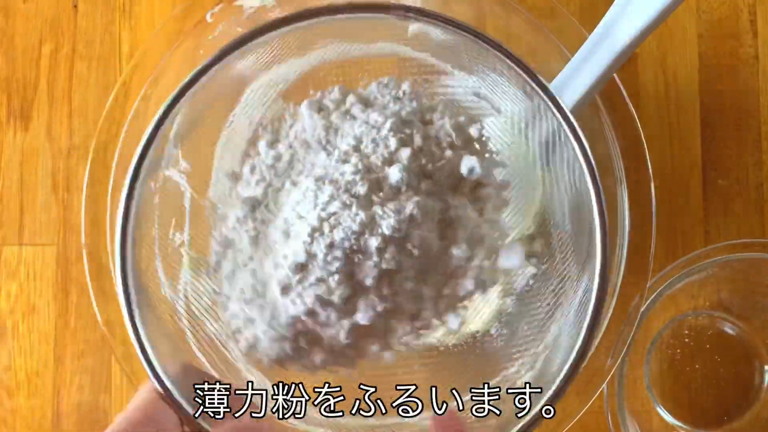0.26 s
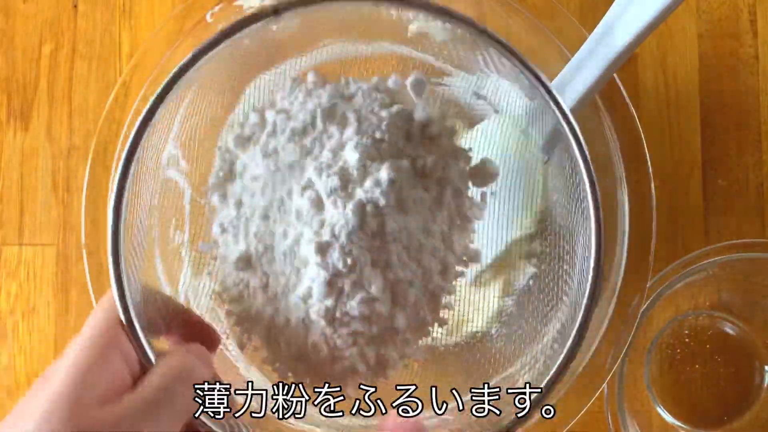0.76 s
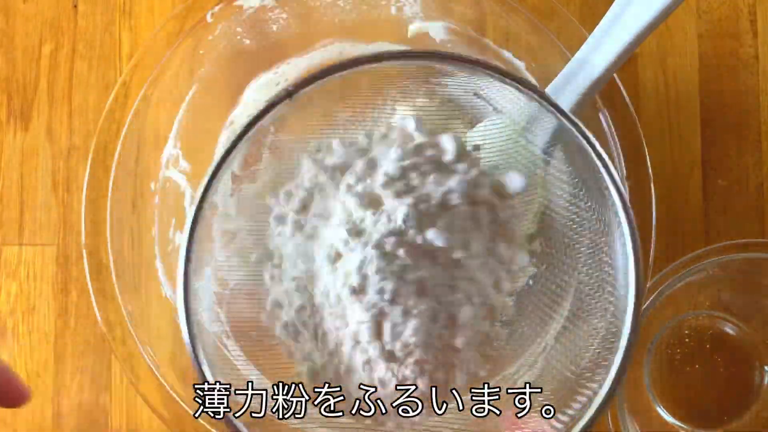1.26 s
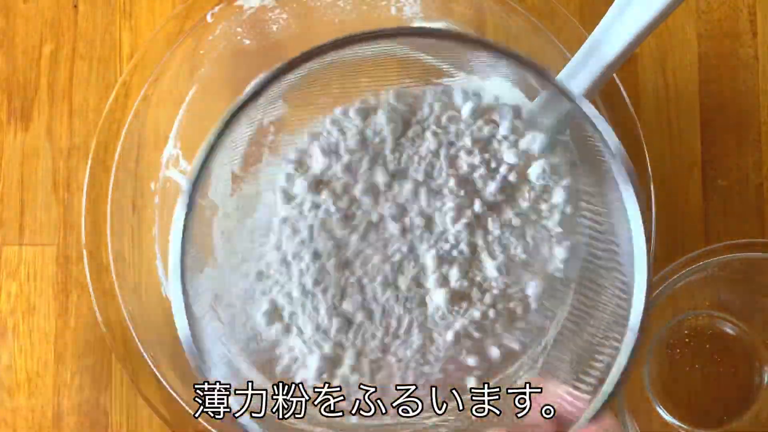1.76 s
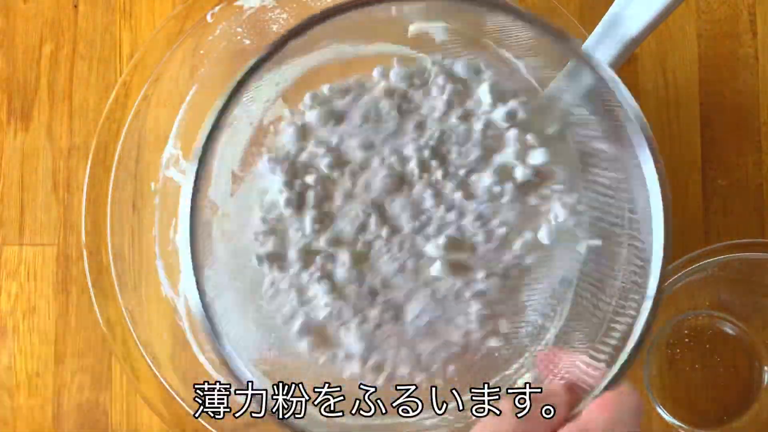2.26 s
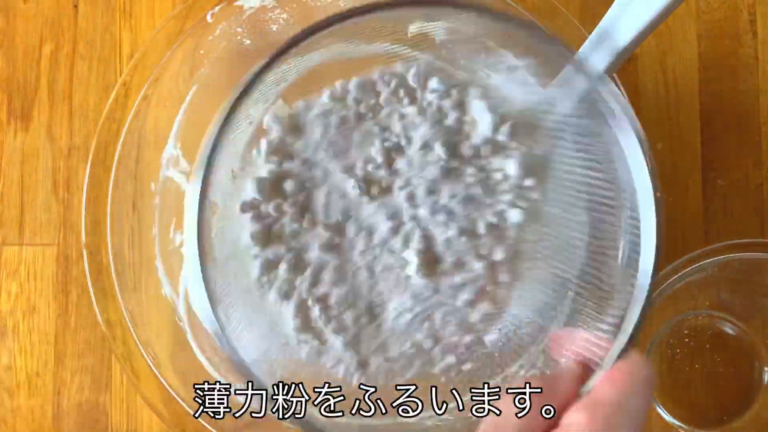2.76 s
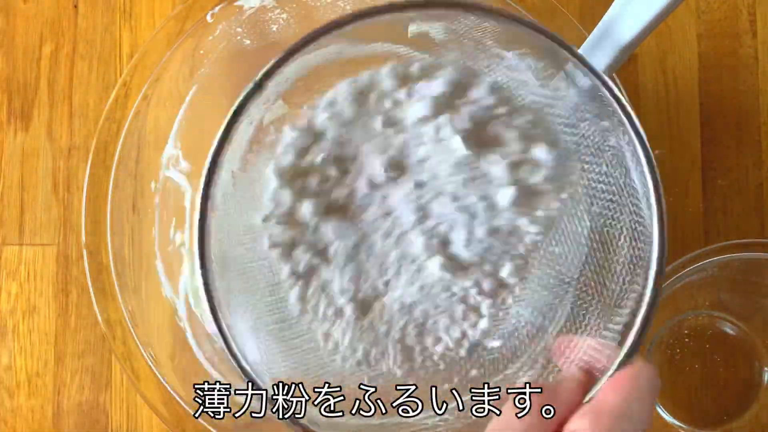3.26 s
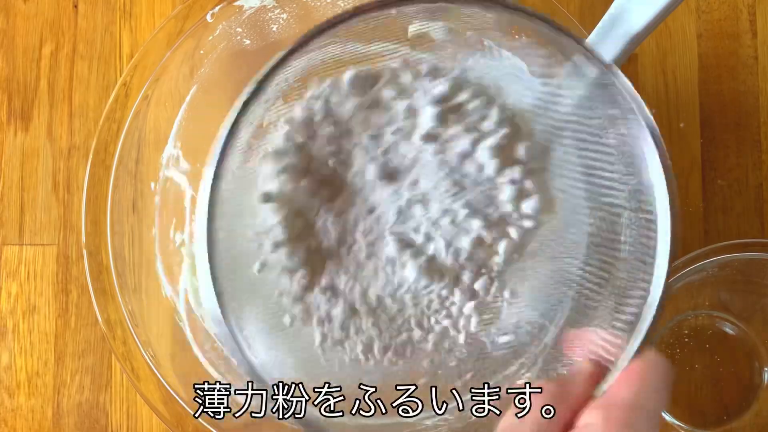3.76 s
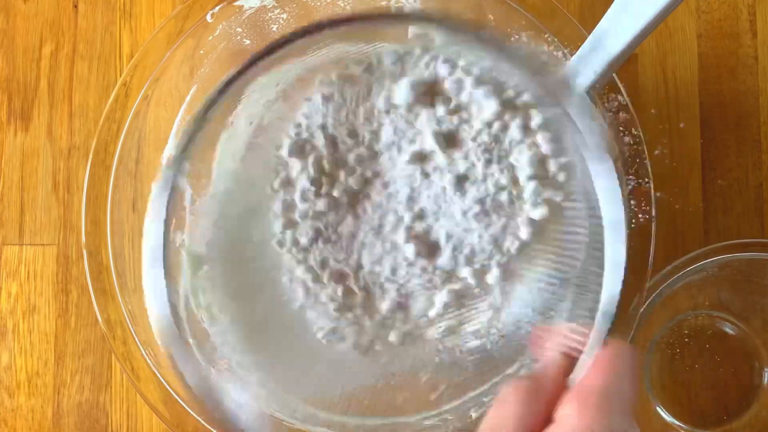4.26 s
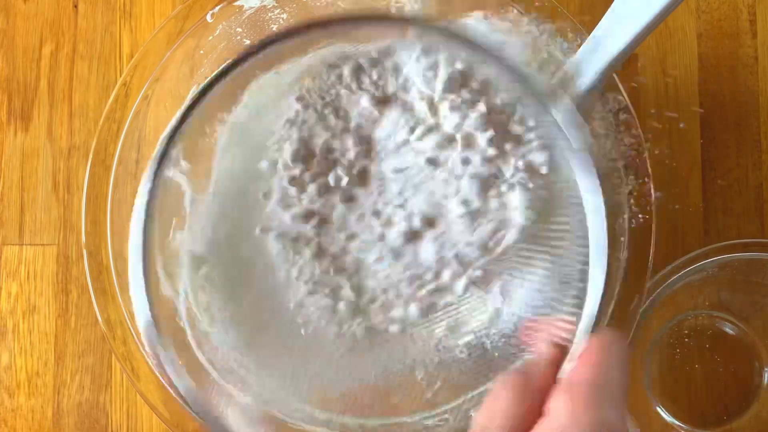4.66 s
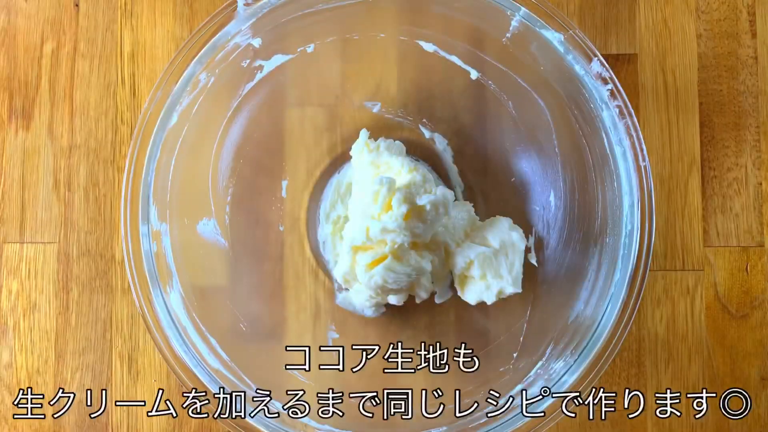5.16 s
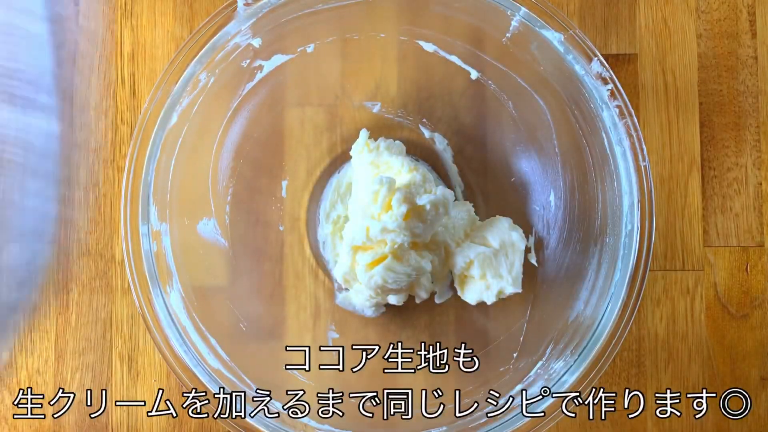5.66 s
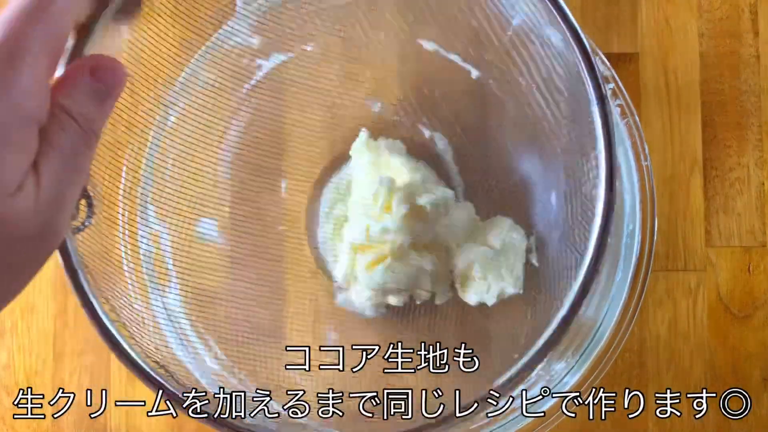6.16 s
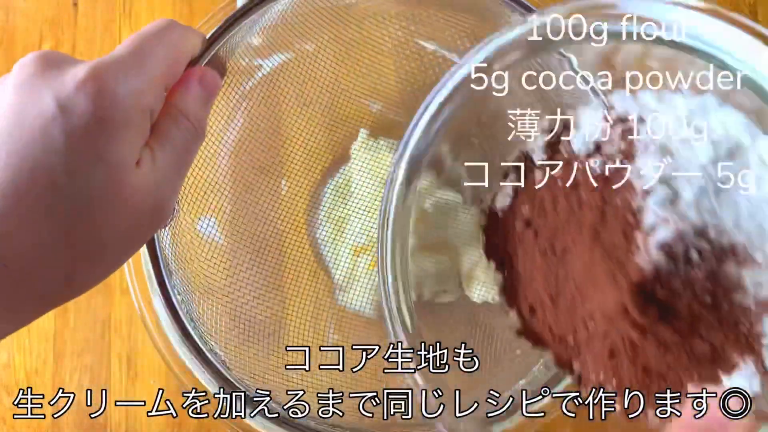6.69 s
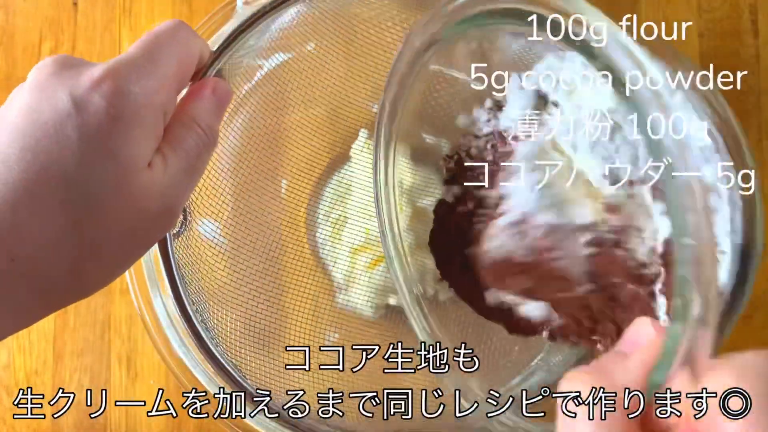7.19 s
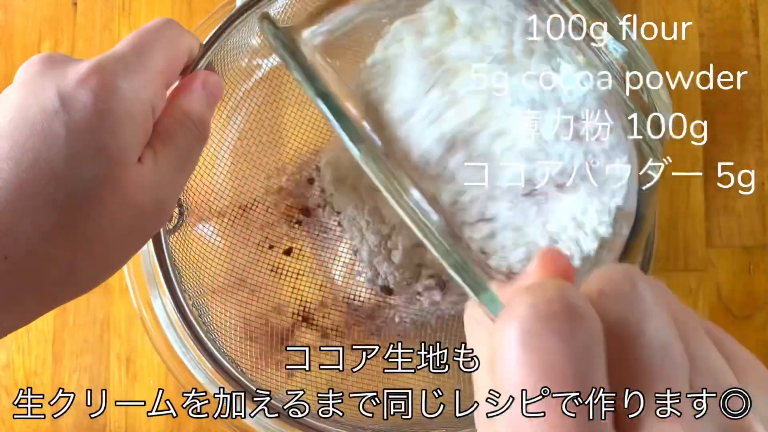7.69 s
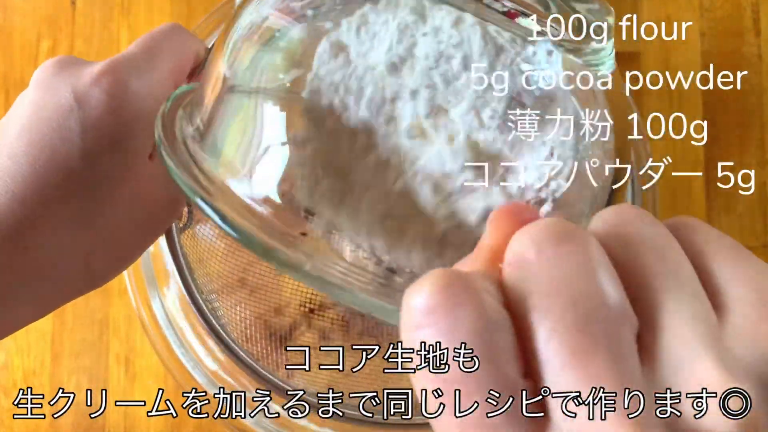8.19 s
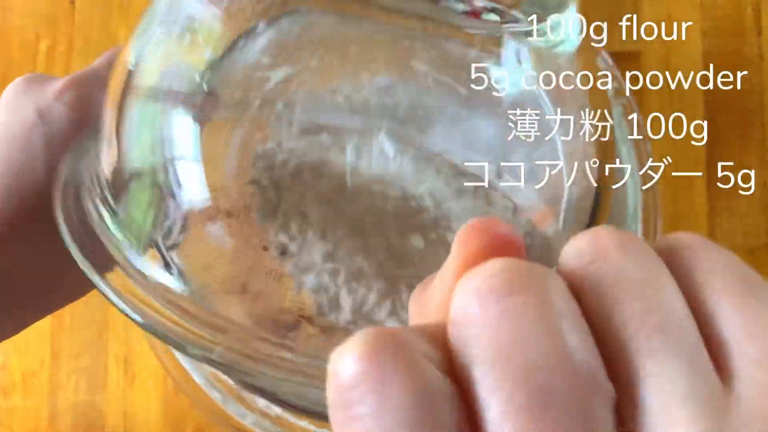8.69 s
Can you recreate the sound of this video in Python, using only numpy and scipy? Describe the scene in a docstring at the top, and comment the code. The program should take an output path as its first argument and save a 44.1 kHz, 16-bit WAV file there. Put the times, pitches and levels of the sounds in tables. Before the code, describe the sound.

A metal sieve rattles on glass, flour hisses through it in steady fast strokes with one dull thud, and powder later drops in crumbly plops.

```python
"""A sieve is gripped over a glass bowl in a quiet kitchen: its wire mesh ticks and scrapes, as noise bursts through wire modes.
It is then shaken: at every stroke filtered grains swish, and in the midst one dull thud of swelling noise bands and sines
sounds in the building. A wavering low sine hums at times, and hands rumble softly as filtered noise.
Later the sieve is set over a bowl again and a small glass dish clinks on it, as cracks and damped sines.
Powder is jogged out last in soft, crumbly plops of noise and tiny impacts. A pair of microphones listens close by."""
import sys
import numpy as np
from scipy import signal
from scipy.fft import rfft, irfft, next_fast_len
from scipy.io import wavfile
from scipy.ndimage import uniform_filter1d

SR = 44100
rng = np.random.default_rng(int(sys.argv[2]) if len(sys.argv) > 2 else 0)


def transcribe(u):
    """Save the signal u as a 16-bit wav file named by the first command-line argument.

    u: samples, shape (n,) or (channels, n), limited to [-1, 1]; the rate is SR.
    q: integer samples, one column per channel.
    """
    v = np.clip(np.atleast_2d(u).T, -1, 1)
    q = np.round(v * 32767).astype(np.int16)
    wavfile.write(sys.argv[1], SR, q)


N = 393813
TIME = np.arange(N) / SR

# Room air, colour of the steady hiss: (frequency [Hz], gain [dB])
AIR_COLOUR = [(25, -3), (60, 13), (130, 5.5), (250, -3), (500, -8.5), (1000, -16), (2000, -19),
              (4000, -23.5), (7000, -26.5), (8500, -17), (10500, -18.5), (11700, -45), (13000, -18.5),
              (15000, -26), (16000, -52.5)]
AIR_DB = -71.5
# What the room returns of the sieve, whose 8 kHz ring is mostly direct: (frequency [Hz], gain [dB])
WALL_COLOUR = [(500, 8.5), (2500, 6), (4500, 3), (6200, 4), (7500, -7.5), (8400, -4), (9600, 5.5),
               (13000, -8), (16000, -5.5)]
# A faint low hum comes and goes: (start [s], end [s], level [dB])
HUMS = [(1.34, 2.193, -68.5), (3.19, 4.195, -73.5)]

# Hands carry the sieve over the bowl: (time [s], deep rumble [dB], grip before its trim [dB])
CARRY = [(4.6, -88, -85), (4.66, -75.5, -86), (4.79, -72, -71), (4.92, -61, -70.5), (5.62, -61.5, -66),
         (5.7, -68, -65.5), (5.979, -58, -55.5), (7.0, -73.5, -74.5)]
# Rumble and grip while the hands merely hold the utensils
HOLD_DEEP_DB, HOLD_GRIP_DB = -72.5, -74.5
# Colours of the deep rumble and of the grip: (frequency [Hz], gain [dB])
RUMBLE_COLOUR = [(25, -19.5), (42, -10.5), (58, 6), (72, -11), (100, -23), (200, -29.5)]
GRIP_COLOUR = [(60, -18.5), (95, 2), (120, 3), (160, -5), (240, -11.5), (330, -22), (600, -35.5)]
# Soft rustles, perhaps of sleeves as the arms move: (time [s], level [dB], half length [s])
RUSTLES = [(0, -71.5, 0.21), (0.407, -72, 0.07), (1.052, -69.5, 0.15), (1.675, -76.5, 0.15),
           (4.668, -75, 0.11), (4.977, -76, 0.11), (5.789, -71.5, 0.21)]
# Dull rubs of the fingers on the utensils: (time [s], level [dB], half length [s], pitch [Hz])
RUBS = [(0.787, -74.5, 0.11, 338), (0.976, -73, 0.3, 370), (1.163, -63.5, 0.041, 348),
        (3.419, -68.5, 0.071, 330), (3.611, -74.5, 0.2, 324), (4.776, -58, 0.034, 127.6),
        (6.081, -63, 0.067, 234), (6.253, -89, 0.037, 239), (6.523, -71, 0.12, 236),
        (8.144, -69, 0.13, 129.7), (8.72, -67.5, 0.17, 130)]
# Colour of a rub at the reference pitch: (frequency [Hz], gain [dB])
FINGER_COLOUR = [(120, -8), (200, 5.5), (280, 2.5), (360, -8), (480, -14.5), (700, -32.5)]
FINGER_REF_HZ = 240

# A dull thud in the building, by noise band: (centre [Hz], level [dB], rise [s], t60 [s])
THUD_BANDS = [(63.2, -50, 0.048, 0.92), (126, -53, 0.0042, 1), (188.4, -46, 0.0073, 0.57),
              (299, -45, 0.0046, 0.62), (406, -54, 0.0018, 0.41), (540, -48, 0.001, 0.5),
              (660, -71, .001, 0.14), (840, -63.5, 0.0019, 0.44)]
# The thud rings the floor and swells the room's resonances: (frequency [Hz], level [dB], rise [s], t60 [s])
BOOM_MODES = [(62.3, -53, 0.038, 0.4), (144.8, -51, 0.017, 0.33), (193.4, -42, 0.13, 0.17),
              (302, -49.5, 0.081, 0.26), (332.4, -42.5, 0.001, 0.25), (508, -39, 0.0016, 0.11),
              (542, -51, 0.0011, 0.17), (635, -51, 0.00086, 0.11), (710, -72, 0.0017, 0.72)]
THUD_S = 2.8858

# Faint rings: the bowl's at the start, and a close cluster of wire modes near 5 kHz after the tick at 5.5 s:
# (time [s], frequency [Hz], level [dB], t60 [s])
FAINT_RINGS = [(0, 531, -60, .35), (0, 1157, -63, .2), (5.503, 4590, -77, .15), (5.503, 4770, -75, .14),
               (5.503, 4910, -75, .16), (5.503, 5130, -77, .13)]
# Glass knocks under the harder contacts:
# (time [s], level [dB], t60 [s], pitch [Hz], clink against the knock [dB])
KNOCKS = [(0.6052, -52, 0.08, 850, -26), (6.5838, -43.5, 0.14, 1950, -24), (7.2838, -49.5, 0.06, 2550, -40)]
# Colour of a glass knock at the reference pitch: (frequency [Hz], gain [dB])
GLASS_COLOUR = [(500, -19), (680, -13), (1000, -13), (1350, -2), (1900, 0), (2450, 1), (2900, -7),
                (3400, -11), (4300, -8), (5200, -2), (6300, -3), (7200, -10)]
GLASS_REF_HZ = 2000
# Modes of the hand-damped glass, which rings briefly: (frequency [Hz], level [dB], t60 [s])
CLINK_MODES = [(1300, -1, .09), (1448, 1, .1), (1965, -10, .06), (3004, -3, .06), (3671, -6, .06),
               (4247, -6, .06), (5206, -6, .06), (5889, -3, .07)]

# Mesh dragging over glass: (start [s], end [s], level [dB], overtones against that level [dB])
SCRAPES = [(0.031, 0.143, -66.5, -8), (0.222, 0.236, -52, -1.5), (0.246, 0.271, -52.5, -3),
           (0.371, 0.492, -59, -9), (0.5, 0.538, -59, -8.5), (0.425, 0.437, -55.5, -9),
           (0.541, 0.562, -53, -8), (0.579, 0.636, -47, -1), (0.67, 0.699, -50, 2),
           (0.77, 0.782, -61.5, -7), (0.954, 1.04, -66.5, -13), (6.17, 6.241, -69.5, -15),
           (6.659, 6.765, -70.5, -27.5), (7.057, 7.217, -68, -27), (7.283, 7.327, -71, -23)]
# Wire mesh ticks against the bowl, levels before trims: (time [s], contact time [s], ring pitch [Hz],
# ring level [dB], then against the ring: low modes [dB], modes near 10 kHz [dB], overtones [dB])
TICKS = [(0.1844, 0.0017, 7710, -47.0, -14.0, -5.0, -4.0),
         (0.2022, 0.0032, 8280, -26.5, -17.5, -11.5, -6.5),
         (0.2378, 0.0026, 8000, -22.0, -23.5, -12.5, -8.0),
         (0.2497, 0.0034, 7800, -28.0, -22.5, -13.5, -9.5),
         (0.2772, 0.0029, 7830, -43.5, -18.5, -16.0, -14.5),
         (0.3217, 0.0011, 8040, -46.0, -25.5, -22.0, -22.0),
         (0.4056, 0.0035, 7880, -34.5, -27.0, -21.5, -16.0),
         (0.4204, 0.0038, 8090, -46.0, -21.0, -17.0, -14.0), (0.4304, 0.002, 8080, -37.5, -14, -8, -10),
         (0.4373, 0.0011, 8000, -34.5, -18.0, -17.0, -13.5),
         (0.4526, 0.0029, 8330, -41.5, -23.5, -20.5, -15.5),
         (0.4902, 0.0013, 7800, -24.5, -21.0, -22.0, -15.5),
         (0.5418, 0.0015, 7930, -48, -16.5, -16.0, -9.0), (0.5848, 0.0046, 8330, -37.0, -20.5, -7.5, 0.0),
         (0.5925, 0.0026, 8030, -29.0, -21.0, -9.5, -7.0),
         (0.5955, 0.0031, 8060, -32.0, -23.5, -8.0, -12.5), (0.6, 0.0022, 8130, -29.5, -28.0, -17.5, -21.0),
         (0.6056, 0.0018, 8160, -14.5, -26.0, -17.0, -10.0),
         (0.6081, 0.0022, 8300, -25.0, -21.5, -15.5, -5.0),
         (0.6124, 0.0052, 8280, -44.0, -19.5, -10.0, -7.0),
         (0.6236, 0.0023, 8160, -26.5, -19.0, -11.0, -2.5),
         (0.6277, 0.0058, 8170, -35.5, -19.0, -7.5, -3.5), (0.6339, 0.0045, 8310, -37.5, -18.0, -9.5, -4.0),
         (0.6757, 0.0013, 8050, -46.5, -15.0, -6.0, 5), (0.6926, 0.0027, 8220, -42.5, -16.0, -10.0, 0.5),
         (0.7149, 0.0019, 8090, -38.5, -16.0, -8.0, -7.0),
         (0.7183, 0.0007, 8200, -23.0, -23.5, -14.0, -10.0),
         (0.7566, 0.0034, 8550, -29.0, -24.0, -9.5, -9.5), (0.779, 0.006, 8550, -51.0, -14.5, -9.5, -7.0),
         (0.9272, 0.0014, 7840, -47.5, -27.0, -24.0, -23.5),
         (1.0744, 0.0008, 7930, -28.5, -18.0, -19.5, -10.0),
         (1.088, 0.0015, 8160, -49.5, -16.0, -17.5, -7.0),
         (1.1229, 0.0021, 8120, -42.5, -20.0, -17.0, -16.5),
         (5.1733, 0.0011, 8390, -49.0, -7.5, -14.0, -11.0),
         (5.2968, 0.0026, 8130, -42.0, -16.5, -8.0, -7.5), (5.3011, 0.0041, 7840, -49.0, -17.5, -9.5, -8.5),
         (5.5026, 0.0019, 7640, -43.0, -12.0, 0.5, -1.5),
         (5.9416, 0.0014, 7980, -48.5, -19.0, -21.5, -21.0),
         (6.0437, 0.0062, 8190, -71.0, -21.0, -18.0, -24.5),
         (6.165, 0.0019, 8110, -61.0, -20.0, -15.5, -15.5),
         (6.5839, 0.0008, 8260, -28.5, -14.5, -13.5, -9.5),
         (6.622, 0.002, 8190, -48.0, -12.5, -11.5, -14.0),
         (6.678, 0.0075, 8170, -62.5, -25.5, -23.0, -33.0),
         (6.7002, 0.0012, 8200, -52.5, -28.0, -24.5, -35.5),
         (6.7216, 0.0029, 8310, -53.5, -32.0, -28.0, -26.5),
         (6.7295, 0.0058, 8340, -56.5, -29.5, -23.5, -32.0),
         (6.7463, 0.0053, 8350, -63.0, -26.0, -24.0, -27.5),
         (6.9609, 0.0022, 8280, -63.5, -21.0, -20.5, -19.0),
         (7.0731, 0.004, 8470, -57.5, -28.0, -21.5, -26.5),
         (7.0844, 0.0021, 8210, -51.0, -29.0, -24.5, -27.5),
         (7.0939, 0.0009, 8580, -49.5, -28.5, -19.0, -31.0),
         (7.1013, 0.0013, 8000, -43.5, -32.0, -23.0, -37.5),
         (7.106, 0.0052, 8570, -54.5, -35.0, -12.0, -32.0),
         (7.1294, 0.0047, 8500, -58.0, -26.0, -15.5, -28.0),
         (7.1408, 0.0024, 8240, -53.5, -21.5, -19.5, -26.5),
         (7.1467, 0.0035, 8260, -47.5, -27.0, -16.0, -26.5),
         (7.1828, 0.0014, 8470, -42.0, -36.5, -22.5, -34.0),
         (7.2073, 0.003, 8340, -51.5, -40.0, -42.5, -38.5),
         (7.2155, 0.0057, 8330, -60.5, -27.0, -25.0, -33.5),
         (7.2938, 0.0027, 8200, -64.0, -9.5, -15.5, -24.5),
         (7.3055, 0.0007, 8040, -51.0, -17.0, -23.0, -25.0),
         (8.3004, 0.0019, 7920, -47.5, -23.0, -16.0, -15.5)]
# Four groups of wire modes, from the main ring at its reference pitch, through the low modes
# and the modes near 10 kHz, to the overtones: (frequency [Hz], gain [dB])
MESH_COLOUR = [(5500, -43), (6500, -30), (7300, -11), (7750, -8), (8100, -3), (8400, -5), (8800, -12.5),
               (9500, -25), (10800, -32.5), (11600, -42)]
LOW_COLOUR = [(600, -25), (1000, -15.5), (1700, -16.5), (2800, -5.5), (3400, -7.5), (4050, -2.5),
              (4850, -1), (5500, -4.5), (6500, -5.5), (7300, -15.5)]
UPPER_COLOUR = [(8800, -24), (9500, -9), (10100, 1.5), (10900, 7), (11600, -15)]
OVERTONE_COLOUR = [(11000, -19.5), (12400, 2.5), (13200, -5), (14400, -5.5), (15500, -13), (16500, -29)]
MESH_REF_HZ = 8060
# A wire stops chattering at once, and the bowl's first echoes are short
CHATTER_S, ECHO_T60_S = .003, .022
# The wire basket rings on: (frequency [Hz], level [dB], t60 [s])
BASKET_MODES = [(4240, -2.5, 0.11), (4650, -6, .1), (5022, -5, .1), (5350, -3.5, 0.1019), (7990, -1.5, .11),
                (8000, -1, .13), (8450, -0.5, .12), (8420, -1.5, .13), (8590, 1.5, .1), (9000, -0.5, .08),
                (9700, -0.5, 0.12), (13300, -1.5, .1), (12957, -1, .12), (14234, -1, .1)]

# Jogs of the dish that drop powder: (time [s], level [dB], length [s], crumbs against the lump [dB])
PLOPS = [(7.464, -71.5, 0.025, -4), (7.555, -74.5, 0.048, -3), (7.698, -75, 0.014, 2),
         (7.725, -76, 0.014, 1), (7.798, -73.5, 0.04, -4), (7.959, -72, 0.047, -6),
         (8.009, -69.5, 0.041, -10), (8.125, -69.5, 0.06, -8), (8.283, -64, 0.04, -8),
         (8.46, -63.5, 0.033, -8), (8.603, -64.5, 0.028, -8), (8.757, -62.5, 0.02, -5)]
# Colours of the lump in the hollow, its crumbs and the soft low heap: (frequency [Hz], gain [dB])
PLOP_COLOUR = [(70, -11), (170, 7), (330, 5.5), (560, -1.5), (750, -12), (950, -9), (1250, -41),
               (1480, -13.5), (1590, -4.5), (1700, -30), (3000, -42), (6000, -48.5)]
CRUMB_COLOUR = [(500, -8), (950, 14.5), (1300, -9.5), (1600, 6), (2100, -19), (4000, -32)]
HEAP_COLOUR = [(100, -2.5), (220, -3.5), (420, -11.5), (650, -10), (1200, -13.5), (2500, -17.5),
               (6000, -27.5)]

# Strokes of the shaken sieve, levels before trims: (time [s], mesh [dB], powder [dB])
STROKES = [(1.228, -81, -89), (1.302, -77, -79), (1.372, -74, -73.5), (1.446, -79, -85), (1.517, -73, -77),
           (1.604, -70, -82), (1.672, -64.5, -69.5), (1.742, -70, -76), (1.818, -66, -68.5),
           (1.897, -65.5, -71), (1.976, -63.5, -66), (2.061, -63, -67), (2.14, -64, -66.5),
           (2.223, -62, -67.5), (2.298, -64.5, -64.5), (2.379, -65, -66), (2.456, -64.5, -63.5),
           (2.536, -62, -64), (2.61, -62, -62.5), (2.689, -60, -62), (2.764, -61.5, -61.5),
           (2.852, -62.5, -66), (2.916, -63.5, -66.5), (3.004, -60.5, -64.5), (3.085, -61, -60.5),
           (3.165, -60, -62.5), (3.242, -61.5, -62), (3.327, -59.5, -60.5), (3.402, -61, -59.5),
           (3.493, -60.5, -59.5), (3.573, -59.5, -58.5), (3.656, -58.5, -58.5), (3.737, -61.5, -59.5),
           (3.825, -59.5, -60.5), (3.906, -60, -59.5), (3.992, -60, -62), (4.072, -59.5, -60),
           (4.155, -61, -60), (4.237, -62.5, -59.5), (4.319, -59.5, -61), (4.398, -60.5, -60),
           (4.481, -60.5, -59.5), (4.555, -62, -63.5), (4.612, -70, -82)]
# No two strokes are alike: random spread of slide length and sizzle pitch (shares)
STROKE_STRETCH, STROKE_DETUNE = .1, .012
# Sizzle that carries on around a stroke, against the stroke
LINGER_DB = -17
# Colours of the swishing mesh and of the hissing powder: (frequency [Hz], gain [dB])
SWISH_COLOUR = [(3000, -41.5), (6200, -18.5), (7100, 0), (7800, 1.5), (8450, 5), (9100, -7.5), (10500, -14),
                (11600, -36), (12600, -12.5), (15000, -20), (16000, -35)]
POWDER_COLOUR = [(250, -29), (600, -0.5), (1150, -2.5), (1700, -4), (2500, 0), (3500, -9), (5000, -16),
                 (8000, -16), (14000, -35.5)]

# Left microphone against right: midrange earlier, treble later, turning over at TURN_HZ
MID_LEAD_S, TREBLE_LAG_S, TURN_HZ = 8 / SR, 9.55 / SR, 6300
TOP_HZ = 16300


def undb(db):
    """Decibels to gain."""
    return 10 ** (np.asarray(db) / 20)


def unit(x):
    """Scale to an rms of 1."""
    return x / np.sqrt(np.mean(x ** 2) + 1e-30)


def colour(x, points):
    """Causal filter with a (Hz, dB) response, built from the cepstrum of its log gain."""
    size = next_fast_len(x.shape[-1] + 2048, real=True) * 2
    hz, db = np.transpose(points)
    f = np.arange(size // 2 + 1) * SR / size + 0.0011
    # Beyond the end points the gain falls by 18 dB an octave, by 50 dB at most
    octaves_beyond = np.maximum(np.log2(hz[0] / f), 0) + np.maximum(np.log2(f / hz[-1]), 0)
    gain_db = np.interp(np.log(f), np.log(hz), db) - np.minimum(18 * octaves_beyond, 50)
    cepstrum = irfft(np.log(undb(gain_db)))
    # Folding the cepstrum forward in time gives minimum phase
    cepstrum[1:size // 2] *= 2
    cepstrum[size // 2 + 1:] = 0
    return irfft(rfft(x, size) * np.exp(rfft(cepstrum)))[..., :x.shape[-1]]


def shifted(points, ratio):
    """The same colour moved up or down in pitch."""
    return [(hz * ratio, db) for hz, db in points]


def add(track, s, sound):
    """Mix a sound into a track from time s on."""
    i = max(int(s * SR), 0)
    track[..., i:i + sound.shape[-1]] += sound[..., :max(N - i, 0)]


def during(start, end):
    """Gate that is open between two times."""
    return (TIME > start) & (TIME < end)


def swell(s, half_s):
    """A smooth rise and fall around time s; top 1."""
    return np.exp(-((TIME - s) / half_s) ** 2)


def fade(t, rise_s, t60_s):
    """Swell for a moment, then die away exponentially; top 1."""
    shape = (1 - np.exp(-(t / rise_s) ** 2)) * np.exp(-np.log(1000) * t / t60_s)
    return shape / shape.max()


def flicker(rate, depth_db):
    """Gain that wanders at random about rate times a second."""
    k = max(int(SR / rate), 2)
    steps = np.repeat(rng.standard_normal(N // k + 1), k)[:N]
    return undb(depth_db * uniform_filter1d(steps, k))


def diffuse(size):
    """Noise from all around: alike at both microphones in the bass, unrelated in the treble."""
    mid, side = rng.standard_normal((2, size))
    side = colour(side, [(30, -24.5), (110, -17.5), (250, -9.0), (600, -2.0), (1200, -0.5), (20000, -1.0)])
    return np.array([mid + side, mid - side]) / np.sqrt(2)


def grains(size, spread_db):
    """Dense tiny contacts of very unequal strength."""
    strength = undb(spread_db * np.minimum(rng.exponential(size=size), 6))
    return unit(rng.standard_normal(size) * strength)


def crumbs(size, rate, spread_db):
    """Separate tiny impacts of either sign and unequal strength, about rate a second."""
    hits = (rng.random(size) < rate / SR) * rng.choice([-1, 1], size)
    return unit(hits * undb(spread_db * np.minimum(rng.exponential(size=size), 3)))


def ring(modes, size):
    """Damped sines of a struck object."""
    t = np.arange(size) / SR
    return sum(undb(db) * np.sin(2 * np.pi * hz * t) * np.exp(-np.log(1000) * t / t60)
               for hz, db, t60 in modes)


def ports(x, wide_db=4, wide_hz=1200):
    """Frequency-dependent delay sets the two microphones apart, and a side boost widens the midrange."""
    f = np.arange(N + 1) * SR / (2 * N) + 1e-3
    lag_s = np.interp(f, [TURN_HZ - 500, TURN_HZ + 500], [-MID_LEAD_S, TREBLE_LAG_S])
    right = rfft(x, 2 * N)
    left = right * np.exp(-2j * np.pi * f * lag_s)
    mid = (left + right) / 2
    side = (left - right) / 2 * undb(wide_db * np.exp(-np.log2(f / wide_hz) ** 2))
    return irfft(np.array([mid + side, mid - side]))[:, :N]


def echoed(x, wet_db, gap_s, t60_s, size):
    """Convolve with a tail of fading diffuse noise, scaled to unit energy per microphone."""
    tail = diffuse(size) * fade(TIME[:size], gap_s, t60_s)
    tail /= np.sqrt(np.sum(tail ** 2) / 2)
    return undb(wet_db) * signal.fftconvolve(x[None], tail, axes=1)[:, :N]


def room_air():
    """The room hisses steadily: coloured noise from all around."""
    return undb(AIR_DB) * unit(colour(diffuse(N), AIR_COLOUR))


def kitchen(x):
    """Short diffuse reverberation of a small room."""
    return echoed(colour(x, WALL_COLOUR), wet_db=-12, gap_s=0.0012, t60_s=0.36, size=SR // 2)


def hollow(x):
    """Bowl and worktop throw the sound straight back, differently to each microphone."""
    return echoed(x, wet_db=-11, gap_s=0.0008, t60_s=ECHO_T60_S, size=SR // 10)


def hum(hz=121, waver=0.038):
    """A low sine hum that wavers in pitch and strength."""
    pitch = hz * (1 + waver * np.log(flicker(rate=55, depth_db=8.5)))
    spells = sum(undb(db) * during(start, end) for start, end, db in HUMS)
    strength = uniform_filter1d(spells, size=6000) * flicker(rate=33, depth_db=7.5)
    return strength * unit(np.sin(2 * np.pi * np.cumsum(pitch) / SR))


def handling(grip_trim_db=-2):
    """Hands rumble faintly on the utensils, and more while they carry the sieve."""
    s, deep_db, grip_db = np.transpose(CARRY)
    carry_deep = np.interp(TIME, s, undb(deep_db), left=0, right=0)
    carry_grip = np.interp(TIME, s, undb(grip_db + grip_trim_db), left=0, right=0)
    deep = np.hypot(undb(HOLD_DEEP_DB), carry_deep)
    grip = np.hypot(undb(HOLD_GRIP_DB), carry_grip) * flicker(rate=16, depth_db=3.5)
    return deep * unit(colour(diffuse(N), RUMBLE_COLOUR)) + grip * unit(colour(diffuse(N), GRIP_COLOUR))


def rustles(hiss_db=-5):
    """Each rustle swells and fades as a soft rub with a dry hiss on top."""
    rustle = sum(undb(db) * swell(s, half_s) for s, db, half_s in RUSTLES)
    rustle = rustle * flicker(rate=110, depth_db=1.2)
    rub = unit(colour(diffuse(N), HEAP_COLOUR))
    hiss = unit(colour(diffuse(N), POWDER_COLOUR))
    return rustle * (rub + undb(hiss_db) * hiss)


def rubs():
    """Fingers shift their hold with soft, low scuffs of noise, each at its own pitch."""
    out, t = np.zeros((2, N)), np.arange(-SR // 3, SR // 3) / SR
    for s, db, half_s, hz in RUBS:
        scuff = unit(colour(diffuse(len(t)), shifted(FINGER_COLOUR, hz / FINGER_REF_HZ)))
        add(out, s + t[0], undb(db) * np.exp(-(t / half_s) ** 2) * scuff)
    return out


def thud(width=0.2):
    """A muffled thud: noise bands and resonant sines each swell and die away at their own pace."""
    out, t = np.zeros((2, N)), TIME[:SR]
    for hz, db, rise_s, t60_s in THUD_BANDS:
        skirt = [(hz / (1 + width) ** 2, -22), (hz / (1 + width), -2),
                 (hz * (1 + width), -2), (hz * (1 + width) ** 2, -26)]
        shape = fade(t, rise_s, t60_s)
        band = colour(diffuse(SR), skirt) * shape
        add(out, THUD_S, undb(db) * unit(band) * np.sqrt(np.mean(shape ** 2)))
    for hz, db, rise_s, t60_s in BOOM_MODES:
        add(out, THUD_S, undb(db) * fade(t, rise_s, t60_s) * np.sin(2 * np.pi * hz * t))
    return out


def faint_rings():
    """The glass bowl, and later the wires, keep ringing faintly in single decaying sines."""
    out, t = np.zeros(N), TIME[:SR]
    for s, hz, db, t60_s in FAINT_RINGS:
        add(out, s, undb(db) * fade(t, 0.00045, t60_s) * np.sin(2 * np.pi * hz * t))
    return out


def knocks(tail_db=-17):
    """Hand-damped glass gives a sharp knock and a brief clink, with a scattered tail. Returns (direct, tail)."""
    direct, scattered, t = np.zeros(N), np.zeros((2, N)), TIME[:SR // 3]
    for s, db, t60_s, hz, clink_db in KNOCKS:
        points = shifted(GLASS_COLOUR, hz / GLASS_REF_HZ)
        crack = colour(rng.standard_normal(len(t)) * np.exp(-t / .0007), points)
        crack /= np.sqrt(np.mean(crack[t < .003] ** 2))
        clink = undb(clink_db) * ring(CLINK_MODES, size=len(t))
        add(direct, s, undb(db) * (crack + clink))
        tail = fade(t, 0.00037, t60_s) * unit(colour(diffuse(len(t)), points))
        add(scattered, s, undb(db + tail_db) * tail)
    return direct, scattered


def scrapes(low_db=-18, catch_db=2, catch_rate=230):
    """Wires drag over the glass in uneven spurts, and single wires catch and let go."""
    drag = sum(undb(db) * during(start, end) for start, end, db, _ in SCRAPES)
    bright = sum(undb(db + over_db) * during(start, end) for start, end, db, over_db in SCRAPES)
    drag, bright = uniform_filter1d(np.array([drag, bright]), size=300)
    catches = (rng.random(N) < catch_rate / SR) * rng.uniform(-1, 1, N)
    spurts = grains(N, spread_db=3) * flicker(rate=160, depth_db=3.5)
    slips = unit(spurts) + undb(catch_db) * unit(catches)
    wires = unit(colour(slips, MESH_COLOUR)) + undb(low_db) * unit(colour(slips, LOW_COLOUR))
    return drag * wires + bright * unit(colour(slips, OVERTONE_COLOUR))


def ticks(chatter_db=-20, trim_db=-0.5, upper_trim_db=-1):
    """A wire snaps onto the rim, skids and chatters; four groups of modes ring. Returns (direct, echoes)."""
    out, thrown, t = np.zeros(N), np.zeros((2, N)), np.arange(1500) / SR
    for s, contact_s, hz, db, low_db, high_db, over_db in TICKS:
        chatter = undb(chatter_db) * np.exp(-(t - contact_s) / CHATTER_S)
        contact = grains(len(t), spread_db=4.5) * np.where(t < contact_s, 1, chatter)
        contact[0] += 4  # the first snap
        groups = [(shifted(MESH_COLOUR, hz / MESH_REF_HZ), 0), (LOW_COLOUR, low_db),
                  (UPPER_COLOUR, high_db + upper_trim_db), (OVERTONE_COLOUR, over_db)]
        tick = 0
        for points, part_db in groups:
            rung = colour(contact, points)
            # Level each group by its energy over the contact and just after
            contact_rms = np.sqrt(np.sum(rung[t < contact_s + .0014] ** 2) / (contact_s * SR))
            tick = tick + rung / contact_rms * undb(db + trim_db + part_db)
        add(out, s, tick)
        add(thrown, s, hollow(tick))
    return out, thrown


def basket(x, ring_db=-24):
    """Every contact leaves a faint metallic ring of damped sines in the wires."""
    wires = ring(BASKET_MODES, size=SR // 2)
    wires = wires / np.sqrt(np.sum(wires ** 2))
    return x + undb(ring_db) * signal.fftconvolve(x, wires)[:N]


def plops(trickle_db=-83, start_s=7.35, end_s=8.45, crumb_rate=300):
    """Lumps of powder drop, ring the dish's hollow and break into crumbs; a faint trickle runs between."""
    t = TIME[:SR // 4]
    trickle = uniform_filter1d(1. * during(start_s, end_s), size=4000) * flicker(rate=82, depth_db=2.5)
    out = undb(trickle_db) * trickle * unit(colour(diffuse(N), HEAP_COLOUR))
    for s, db, length_s, crumb_db in PLOPS:
        shape = (1 - np.exp(-t / .0015)) * np.exp(-(t / length_s) ** 2)
        patter = np.array([crumbs(len(t), rate=crumb_rate, spread_db=5) for _ in range(2)])
        lump = unit(colour(diffuse(len(t)) * shape, PLOP_COLOUR))
        broken = undb(crumb_db) * unit(colour(patter * shape, CRUMB_COLOUR))
        add(out, s, undb(db) * np.sqrt(np.mean(shape ** 2)) * (lump + broken))
    return out


def sifting(slide_s=0.015, powder_slide_s=0.016, powder_trim_db=-4.0, lump_db=-1, lump_rate=500,
            wide_db=-5, wide_mesh_db=-8):
    """At each stroke the heap slides over the mesh: wires sizzle, powder hisses, lumps patter."""
    wires, power = np.zeros((3, N)), np.zeros(N)  # wires: centre, left and right
    t = np.arange(-SR // 12, SR // 12) / SR
    variations = rng.standard_normal((len(STROKES), 2))
    for (s, wire_db, flour_db), (longer, higher) in zip(STROKES, variations):
        u = t / np.exp(STROKE_STRETCH * longer)
        points = shifted(SWISH_COLOUR, 1 + STROKE_DETUNE * higher)
        sizzle = unit(colour(grains((3, len(t)), spread_db=2.5), points))
        slide = np.hypot(np.exp(-(u / (2 * slide_s)) ** 2), undb(LINGER_DB) * np.hanning(len(t)))
        add(wires, s + t[0], undb(wire_db) * slide * sizzle)
        pour = np.exp(-.5 * (u / powder_slide_s) ** 2)
        add(power, s + t[0], undb(flour_db + powder_trim_db) ** 2 * pour)
    wires = wires * unit(flicker(rate=180, depth_db=2.0))
    lumps = undb(lump_db) * crumbs(N, rate=lump_rate, spread_db=-1.5)
    sliding = grains(N, spread_db=1.5) * flicker(rate=140, depth_db=5.0) + lumps
    flour = np.sqrt(power) * unit(colour(sliding, POWDER_COLOUR))
    # The edges of the heap differ at each microphone
    falling = undb(wide_db) * np.sqrt(power) * unit(colour(diffuse(N), POWDER_COLOUR))
    return ports(wires[0] + flour) + undb(wide_mesh_db) * wires[1:] + falling


def scene():
    """Sieve, bowl and powder over the steady hiss of the room."""
    background = room_air() + hum() + handling() + rustles() + rubs() + thud()
    knocked, scattered = knocks()
    dragged = scrapes()
    struck, thrown = ticks()
    sieve = basket(struck + dragged) + faint_rings()
    contacts = ports(sieve + knocked) + thrown + scattered + hollow(dragged) + kitchen(sieve)
    return background + contacts + plops() + sifting()


def record(dry):
    """A steep elliptic low-pass cuts the top of the treble."""
    return signal.sosfilt(signal.ellip(8, .2, 70, TOP_HZ, fs=SR, output="sos"), dry)


dry = scene()
out = record(dry)
transcribe(out)
```